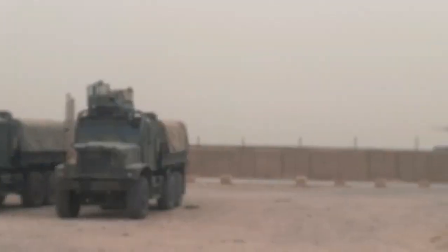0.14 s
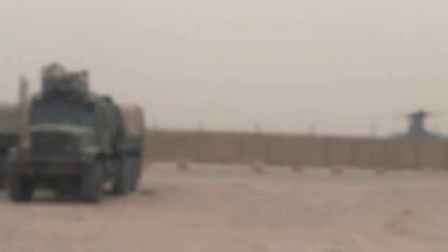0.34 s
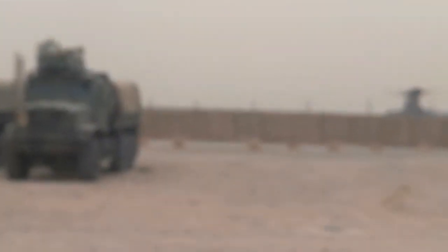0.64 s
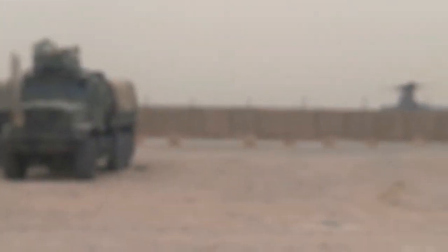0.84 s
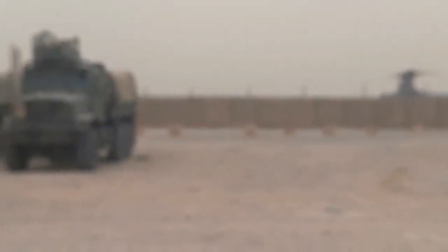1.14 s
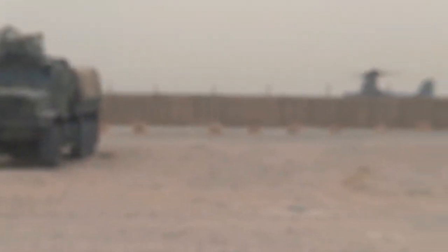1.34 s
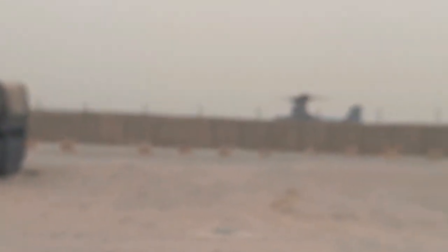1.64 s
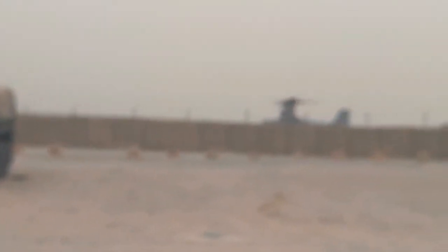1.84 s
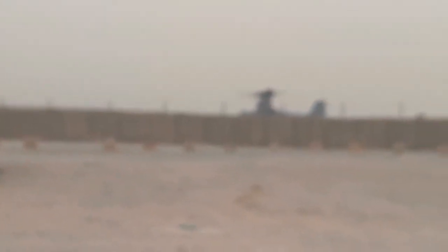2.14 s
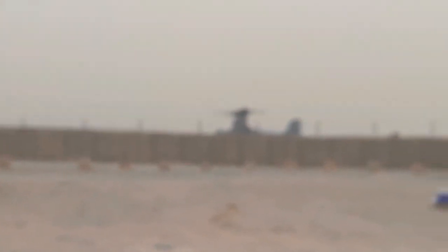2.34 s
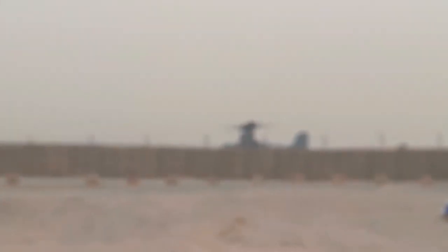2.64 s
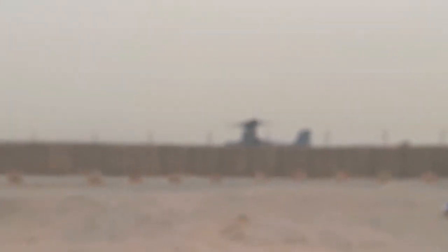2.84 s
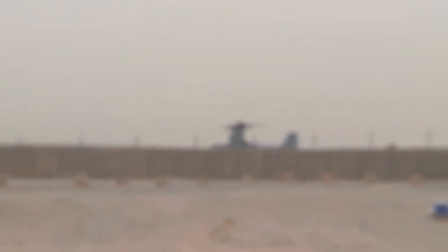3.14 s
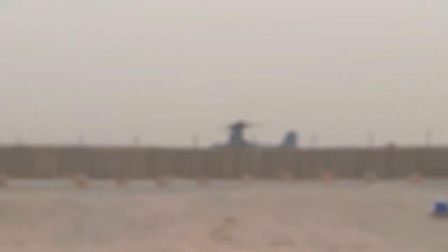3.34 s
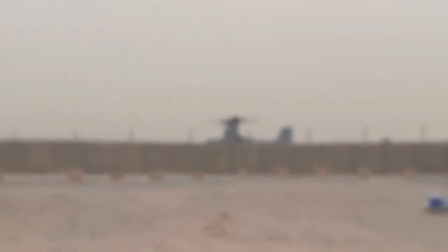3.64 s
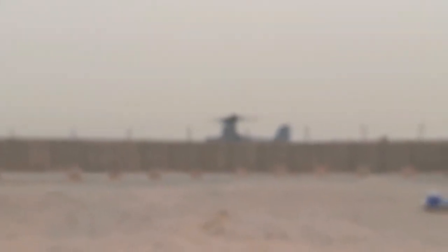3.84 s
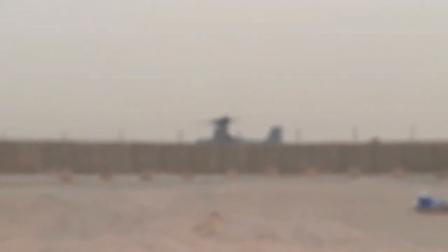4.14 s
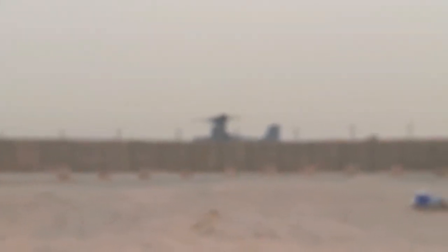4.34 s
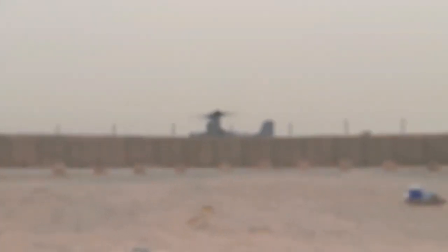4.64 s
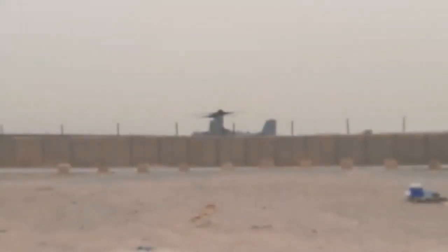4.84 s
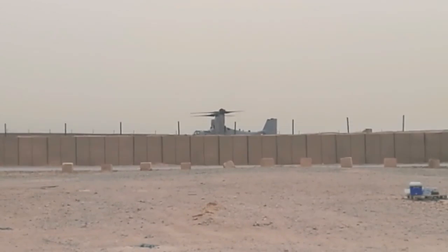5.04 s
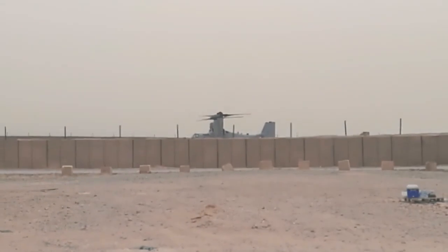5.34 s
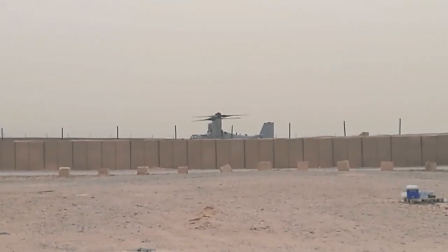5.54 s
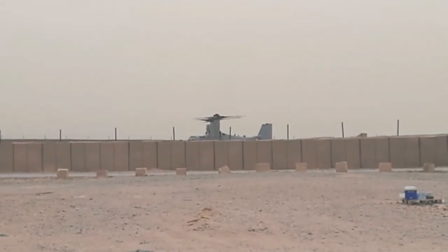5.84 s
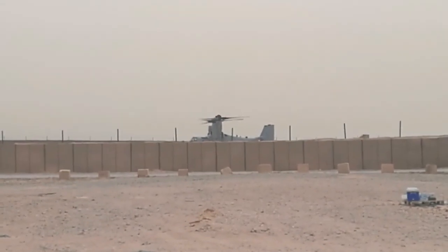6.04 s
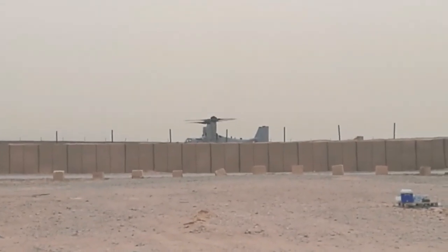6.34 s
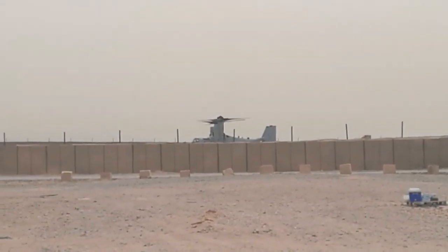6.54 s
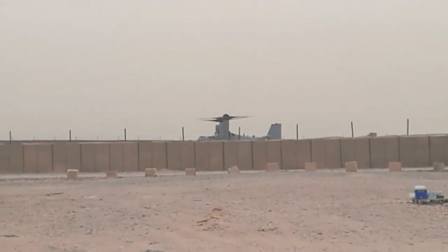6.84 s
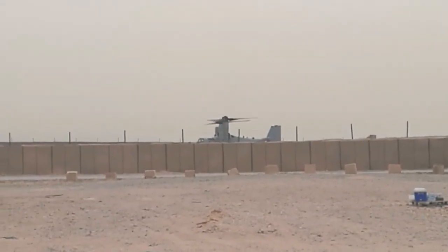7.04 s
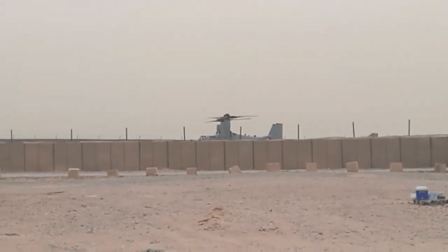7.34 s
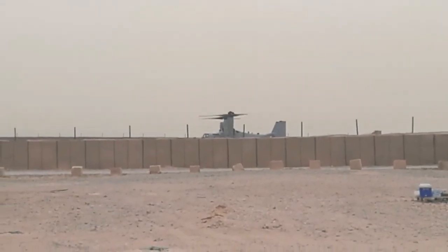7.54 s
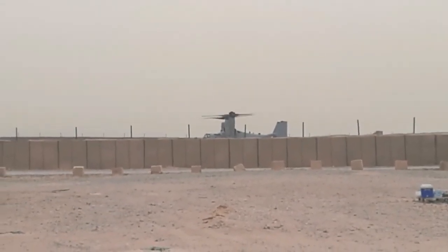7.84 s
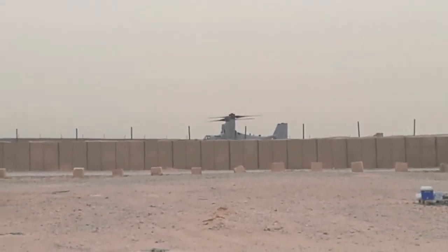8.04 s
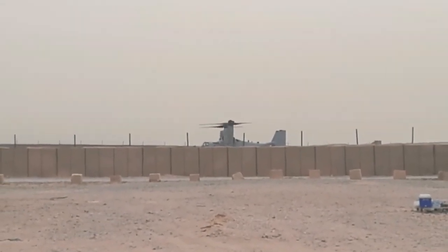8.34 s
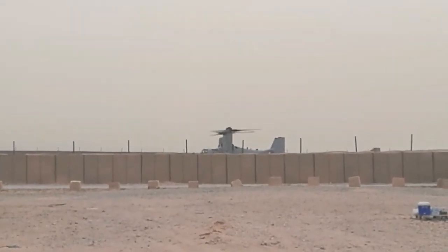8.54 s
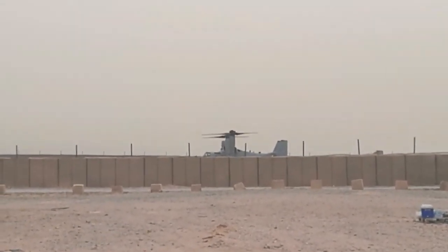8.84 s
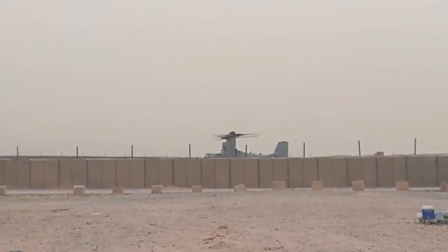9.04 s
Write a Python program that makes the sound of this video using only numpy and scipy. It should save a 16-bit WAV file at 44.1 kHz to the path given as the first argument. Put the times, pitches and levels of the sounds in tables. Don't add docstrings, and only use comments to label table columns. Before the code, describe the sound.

A tiltrotor aircraft runs on the ground behind a wall across an open gravel yard. Two rotors give a fast, regular thumping, around twenty beats a second, with slapping puffs inside a continuous turbine roar. Faint gearbox whines waver underneath. Thin high squeaks appear briefly from about three seconds, and a soft air hiss opens near eight. A small stereo microphone hears it from afar.

```python
import sys
import numpy as np
from scipy import signal
from scipy.fft import rfft, irfft, next_fast_len
from scipy.io import wavfile
from scipy.ndimage import uniform_filter1d

SR = 44100
rng = np.random.default_rng(int(sys.argv[2]) if len(sys.argv) > 2 else 0)


def rack_gain(trim_db):
    fader = np.asarray(trim_db, float)
    return 10 ** (fader / 20)


def store_wav(level_fs):
    pcm = np.round(np.clip(np.atleast_2d(level_fs), -1, 1) * 32767)
    wavfile.write(sys.argv[1], SR, pcm.T.astype(np.int16))


N = 405279
BLADES_PER_S, CYCLE_START_S = 20.4786, -.0007

# (time [s], first rotor delay [ms], second rotor delay [ms])
PATH_DRIFT = [(0, 1.8, 2.1), (.78, 1.9, 1.6), (1.02, -.1, 1), (1.5, .5, 1.3), (2.02, -.1, 1.9),
              (2.25, -.4, -.7), (2.98, -.5, -.7), (3.8, -1.4, .7), (4.69, -.7, .2), (5.1, 1.2, .3),
              (5.5, 0, .6), (6.3, 0, 0), (6.8, -.9, .5), (7.2, -.8, -.2), (7.8, -.3, .7), (8.11, .9, .5),
              (8.55, .4, .5), (8.85, .6, 2.1)]
# (time [s], gust level [dB], clear air level [dB],
# low slap strength [dB], high slap strength [dB])
YARD_WIND = [(0, 1.5, -0.5, 13.5, -1), (.5, 2.5, -1, 10, -2), (1, 1, -0.5, 17.5, -3.5),
             (1.8, 1.5, 0.5, 9.5, 5), (2.15, 1.5, -0.5, 5, 3), (2.6, 1.5, -0.5, 12, 2),
             (3.1, 1.5, 0, 9, -5), (3.5, 1.5, 0.5, 9.5, 1), (4.2, 1, -.5, 17.5, 5), (4.75, 1, 0.5, 16, 0),
             (5.2, 1, 0, 15.5, 7), (5.8, 1, -1, 14, 3.5), (6.3, 0.5, -0.5, 19, 7), (6.9, 1, 0.5, 2, 0),
             (7.25, 2, 0.5, -12, 4.5), (7.6, 1.5, -0.5, -14, -4.5), (8.4, 2.5, 0, 11.5, 2.5),
             (9.19, 3, 1.5, 18, 4.5)]
# (time [s], hollow level [dB], rumble level [dB])
DOWNWASH = [(0, -13, -2), (.7, -32, 0), (1.2, -20, 2), (1.7, -21, 1), (2.2, -41, 1), (2.7, -29, -3),
            (3.2, -25, 2), (3.7, -18.5, 4.5), (4.2, -16, 1), (4.65, -25, 5), (5.0, -33, 5.5),
            (5.6, -37, -1), (6.1, -15, 7.5), (6.6, -25, 4.5), (7.1, -43, 5), (7.6, -36, 5.5),
            (8.1, -30, 1.5), (8.7, -22, 4)]


def evened(x):
    return x / np.sqrt(np.mean(x ** 2) + 1e-20)


def read(points, hz):
    f, *values = np.transpose(points)
    return [np.interp(np.log(hz + 1), np.log(f + 1), v) for v in values]


def resonate(x, hz, width):
    turn = np.exp(2j * np.pi * hz * np.arange(x.shape[-1]) / SR)
    r = np.exp(-np.pi * width / SR)
    return 2 * (turn * signal.lfilter([1 - r], [1, -r], x / turn)).real


def ports(direct, scattered, colour=np.ones_like):
    # (frequency [Hz], likeness [0-1], left lead [rad], left-right level [dB])
    port_match = [(30, .998, .1, .5), (120, .997, .27, .6), (200, .97, .31, .4), (290, .84, .18, .2),
                  (385, .58, 1.1, -1.8), (435, .42, 1.8, .5), (520, .8, 2.3, 4.5), (620, .63, 1.8, 7),
                  (700, .66, 1.2, 5), (840, .72, 1.2, 1), (920, .58, 1.7, -2), (1000, .58, 2.5, 0),
                  (1200, .23, 1.1, .5), (1500, .2, -.3, -4.3), (1700, .38, -1, -4.5), (2100, .54, .4, -5.5),
                  (2300, .35, 1.5, -7.7), (2550, .35, 3, -7), (2850, .25, 4.5, -4), (3300, .3, 6.2, 0),
                  (4500, .1, 6, .4), (5500, .27, 7.4, -.8), (6500, .26, 8.7, 1.6), (8100, .24, 7.5, -1),
                  (9500, .3, 8.2, -1), (15000, .3, 8.2, 0)]
    size = next_fast_len(N)
    hz = np.fft.rfftfreq(size, 1 / SR)
    like, lead, lean_db = read(port_match, hz)
    like = np.clip(like, 0, 1)
    a, b = rfft(direct, size), rfft(scattered, size)
    left = a * rack_gain(lean_db / 2) * np.exp(.5j * lead)
    mixed = like * a + np.sqrt(1 - like ** 2) * b
    right = mixed * rack_gain(-lean_db / 2) * np.exp(-.5j * lead)
    return irfft(np.array([left, right]) * colour(hz), size)[:, :N]


def yard(x, wet, t60, hold_s):
    hop, lag = round(hold_s * SR), np.arange(4000) / SR
    padded = np.pad(x, ((0, 0), (hop, 2 * hop)))
    echoes = np.zeros((2, N + 3 * hop + 4000))
    fade = signal.windows.cosine(2 * hop)
    for start in range(0, N + hop, hop):
        tail = rng.standard_normal((2, 4000)) * rack_gain(-60 * lag / t60) * (lag > .002)
        part = padded[:, start:start + 2 * hop] * fade
        wash = signal.fftconvolve(part, tail / np.linalg.norm(tail[0]), axes=1)
        echoes[:, start:start + 2 * hop + 3999] += wash
    return np.sqrt(1 - wet ** 2) * x + wet * echoes[:, hop:hop + N]


def train(place, late_ms, size_db):
    out = np.zeros(next_fast_len(N + SR))
    t = CYCLE_START_S + (np.arange(len(size_db)) + place) / BLADES_PER_S + late_ms / 1000
    out[np.round(t * SR).astype(int)] = rack_gain(size_db)
    return out


def valve():
    opens_s, rise_s, level_db = 7.8, .067, -49.5
    air = rng.standard_normal((2, N))
    whistle = evened(resonate(resonate(air, 8080, 260), 8080, 260))
    whistle *= rack_gain(np.array([[-6.], [1.5]]))
    hiss = evened(resonate(resonate(air, 7800, 900), 7800, 900))
    opening = np.clip((np.arange(N) / SR - opens_s) / rise_s, 0, 1)
    return rack_gain(level_db) * opening * (whistle + 1.4 * hiss)


def squeaks():
    # (start [s], length [s], frequency [Hz], glide [Hz/s], peak level [dB])
    squeals = [(2.793, .075, 14150, 1507, -57), (2.86, .08, 14550, 99, -65), (2.92, .1, 14250, -2500, -66),
               (3.02, 0.11, 13850, -800, -68), (3.19, 0.058, 13400, -5000, -56),
               (2.885, 0.1, 10950, 96, -65), (4.62, .06, 13850, 102, -62), (4.67, .09, 14350, -4000, -66),
               (4.74, 0.088, 13900, -1500, -56), (4.67, 0.096, 10500, -1000, -64),
               (5.17, 0.12, 9100, -1000, -56), (5.3, 0.074, 8800, 3000, -52), (5.387, 0.04, 8600, 498, -56),
               (5.4, .46, 15500, 698, -67), (5.9, .07, 14350, 9004, -64), (5.82, 0.1, 14150, 2000, -61),
               (5.83, .11, 10800, 202, -60), (5.86, .36, 15400, -100, -61), (6.068, 0.11, 15180, 507, -64),
               (6.03, .11, 14200, 804, -59), (6.12, .05, 13600, 91, -71), (8.643, 0.13, 14200, -300, -51),
               (8.77, .095, 14220, 379, -54), (8.78, 0.18, 15230, -100, -61), (8.58, .06, 13500, 500, -70)]
    level_db, arch, waver_hz = 13.5, 1.3, 40
    out = np.zeros(N)
    for start, length, hz, glide, db in squeals:
        t = np.arange(0, length, 1 / SR)
        waver = evened(uniform_filter1d(rng.standard_normal(SR // 2), size=400))[:len(t)]
        tone = np.sin(2 * np.pi * np.cumsum(hz + glide * t + waver_hz * waver) / SR)
        swell = np.sin(np.pi * t / length) ** arch
        out[round(start * SR):][:len(t)] += rack_gain(db) * swell * tone
    return rack_gain(level_db) * np.array([out, .3 * np.roll(out, 1)])


def gears():
    # (frequency [Hz], width [Hz], level [dB], left-right level [dB])
    gear_tones = [
        (1102, 3.5, -48.5, 3),
        (1971, 5, -49.5, -2),
        (2205, 4, -50, -2),
        (5410, 6, -63, 0),
        (5680, 70, -51.5, 0),
    ]
    # (time [s], level [dB])
    gear_load = [(0, -3), (.5, -6), (1.8, -6), (2.1, 3), (2.75, 5), (3, -5), (3.6, -4), (3.8, 4), (4.5, -1),
                 (5, -5), (5.4, 5), (6.5, 6), (6.9, -3), (7.9, -4), (8.2, 3), (8.6, 0), (9.19, 1)]
    t = np.arange(N) / SR
    out = np.zeros((2, N))
    for hz, width, db, lean_db in gear_tones:
        tone = resonate(resonate(rng.standard_normal((2, N)), hz, width), hz, 3 * width)
        if width < 6:
            tone += .05 * np.sin(2 * np.pi * hz * t)
        out += rack_gain(db) * evened(tone) * rack_gain(lean_db * np.array([[.5], [-.5]]))
    return out * rack_gain(np.interp(t, *np.transpose(gear_load)))


def drifting(frames, across, along):
    patches = rng.standard_normal((frames, 129)).T
    return evened(uniform_filter1d(uniform_filter1d(patches, size=across, axis=0), size=along, axis=1))


def roar():
    # (frequency [Hz], density [dB/Hz])
    roar_colour = [(25, -6), (60, -10), (90, -5), (150, -3), (250, -7.5), (340, -13.5), (390, -17.5),
                   (450, -24.5), (540, -16), (640, -14), (860, -12), (1020, -17), (1250, -10),
                   (1900, -11.8), (2200, -12), (2450, -15.5), (2800, -17.5), (16000, -17)]
    # (frequency [Hz], level [dB])
    distance = [(2600, 0), (3500, 2), (4100, -1.5), (4450, -2.5), (4900, -2), (5700, -5), (7000, -12),
                (8800, -17), (9600, -27.5), (10050, -24), (10550, -31), (11200, -35.5), (12000, -30),
                (13000, -44), (14000, -51), (14800, -66)]
    gust_hz = (750, 1700, 4500, 11000)
    gust_share = (2.32, 0.86, 1.5, 0.74)
    clear_share = (-0.89, -0.45, 0.95, 0.98)
    # (frequency [Hz], width [octaves], place in cycle [0-1], length [ms],
    # extra level [dB], strength column [wind column; above 3.5 the dust])
    slaps = [
        (770, .12, .51, 3.1, -1, 2),
        (725, .16, .26, 8, -5, 2),
        (1900, .4, .83, 2.8, -1, 3),
        (2000, .53, .1, 3.5, -5.5, .5),
        (1350, .2, .75, 3, -7, 3),
        (3600, .87, .86, 2.2, 0, 4),
        (3100, .7, .16, 2.9, 2, 6),
    ]
    # (time [s], top hiss level [dB], slap reach [dB])
    dust = [(0, 4.5, 2.5), (.35, -1, 1), (.6, 0, -12), (1.5, 2.5, -15), (2.1, 2, -7), (2.5, 0.5, -3),
            (3.1, -1, -2), (3.5, 1.5, -17), (4.2, -3, -4), (4.6, 1.5, -10), (5.25, -3, -13), (5.6, 0, -14),
            (6.1, 1.5, -17), (6.6, -1, -13), (7.3, 1, -2), (7.9, 3, -1), (8.5, -2.5, 3.5), (9.19, 0, -7)]
    level_db, flicker_db, patchy_db = -23, .5, 1.4
    puff_db, puff_late_ms = .9, .6
    thin_above_hz, thin_patch_db = 8950, 4

    frames, hz = N // 64 + 5, np.fft.rfftfreq(256, 1 / SR)
    t = np.arange(frames) * 64 / SR
    s, *gusts = np.transpose(YARD_WIND)
    bands_db = np.outer(gust_share, np.interp(t, s, gusts[0]))
    bands_db += np.outer(clear_share, np.interp(t, s, gusts[1]))
    share = np.array([np.interp(np.log(hz + 1), np.log(gust_hz), row) for row in np.eye(4)])

    patches = drifting(frames, 3, 50)
    flicker = evened(uniform_filter1d(rng.standard_normal(frames), 12))
    when, top_db, reach_db = np.transpose(dust)
    thin_db = thin_patch_db * drifting(frames, 5, 90) + np.interp(t, when, top_db)
    thin_db *= (hz > thin_above_hz)[:, None]
    gusty, _, rumble_db = np.transpose(DOWNWASH)
    thin_db += np.outer(np.clip(1.5 - hz / 300, 0, 1), np.interp(t, gusty, rumble_db))

    power = np.ones((129, frames))
    for f, octaves, place, ms, db, column in slaps:
        turns = (t - CYCLE_START_S) * BLADES_PER_S - place + .5
        chance = np.clip(rng.standard_normal((int(turns[-1]) + 2, 2)), -1.6, 1.6)
        chance = chance[turns.astype(int)]
        if column > 3.5:
            strength_db = np.interp(t, when, reach_db)
        else:
            strength_db = np.interp(t, s, gusts[round(column)])
        off_ms = (turns % 1 - .5) / BLADES_PER_S * 1000 - puff_late_ms * chance[:, 0]
        puff = rack_gain(db + strength_db + puff_db * chance[:, 1]) ** 2 * np.exp(-.5 * (off_ms / ms) ** 2)
        band = np.exp(-.5 * (np.log2(hz / f + 1e-9) / octaves) ** 2)
        power += band[:, None] * puff
    power /= uniform_filter1d(power, 340, 1)

    level = share.T @ bands_db + patchy_db * patches + thin_db + flicker_db * flicker
    field = np.sqrt(power) * rack_gain(level)
    re, im = rng.standard_normal((frames, 129, 2, 2)).T
    pair = signal.istft((re + 1j * im) * field, nperseg=256, noverlap=192)[1][:, :N]
    heard = ports(*pair, lambda f: rack_gain(read(roar_colour, f)[0] + read(distance, f)[0]))
    return rack_gain(level_db) * evened(heard)


def crack():
    # (frequency [Hz], width [Hz], place in cycle [0-1],
    # level [dB], wind column [index])
    cores = [
        (680, 290, .545, -38, 2),
        (1890, 800, .865, -37.5, 3),
    ]
    jitter_ms, uneven_db, follow = .22, 0.0, .69
    s, *gusts = np.transpose(YARD_WIND)
    t = np.arange(int(N / SR * BLADES_PER_S)) / BLADES_PER_S
    rings = 0
    for hz, width, place, db, column in cores:
        chance = rng.standard_normal((len(t), 4))
        size_db = follow * np.interp(t, s, gusts[column])
        clicks = np.array([
            train(place, jitter_ms * chance[:, c], size_db + uneven_db * chance[:, 2 + c])[:N]
            for c in range(2)])
        rings = rings + rack_gain(db) * evened(resonate(resonate(clicks, hz, width), hz, width))
    return ports(*yard(rings, wet=.7, t60=.05, hold_s=.3))


def vortex_bursts(strikes, level_db, width_ms):
    fall = .12
    ring_width = 1600 / width_ms
    out, t = np.zeros((2, N + 900)), np.arange(900) / SR
    u = t * 1000 / width_ms - 3
    for s, db, hz in strikes:
        noise = rng.standard_normal((2, 1300))
        ring = evened(resonate(resonate(noise, hz, ring_width), hz, ring_width)[:, 400:])
        tone = np.sin(2 * np.pi * np.cumsum(hz * (1 - fall * np.tanh(u / 2))) / SR)
        first = max(round((s - width_ms / 700) * SR), 0)
        out[:, first:][:, :900] += rack_gain(db + level_db) * np.exp(-.5 * u ** 2) * (.5 * ring + tone)
    return ports(*out[:, :N])


def tip_snaps():
    # (time [s], peak level [dB], frequency [Hz])
    tip_strikes = [(0.0548, -17, 1970), (0.1022, -20, 2050), (0.1501, -18, 1950), (0.2009, -17, 1900),
                   (0.2478, -18, 2080), (0.7362, -18, 1760), (0.9747, -20, 1760), (1.1662, -20, 1790),
                   (1.3608, -18, 1870), (1.4496, -17, 2090), (1.7634, -16, 1830), (1.9869, -22, 2100),
                   (2.0877, -19, 2020), (2.2832, -17, 2110), (2.6254, -19, 2200), (3.0619, -21, 1930),
                   (3.2625, -20, 2200), (3.456, -17, 1780), (3.5059, -20, 1840), (3.8003, -18, 1940),
                   (4.339, -18, 2040), (4.4328, -22, 1920), (4.9232, -18, 1780), (4.9721, -15, 1730),
                   (5.1657, -19, 1950), (5.218, -19, 2190), (5.2649, -16, 1730), (5.3118, -20, 1800),
                   (5.3617, -16, 1890), (5.46, -13, 1960), (5.5084, -15, 2060), (5.5578, -14, 1960),
                   (5.6555, -20, 2010), (5.7044, -17, 2130), (5.7533, -18, 1730), (5.7932, -19, 2040),
                   (5.9958, -20, 1970), (6.0826, -18, 1680), (6.1779, -20, 2200), (6.2387, -19, 2200),
                   (6.3385, -15, 1900), (6.4348, -18, 2190), (6.4847, -15, 1820), (6.5196, -17, 1730),
                   (6.6353, -19, 2080), (6.6832, -17, 2110), (6.7635, -18, 2110), (6.8743, -21, 1930),
                   (7.2235, -18, 2020), (7.2823, -20, 2070), (7.4056, -20, 2060), (7.6435, -21, 1510),
                   (8.4342, -19, 1990), (8.5844, -15, 2170), (8.6802, -20, 2080), (8.7345, -17, 2080),
                   (8.7819, -18, 1560), (8.8263, -19, 2050), (8.9236, -20, 1930), (9.0259, -17, 1720)]
    return vortex_bursts(tip_strikes, level_db=-4.5, width_ms=.98)


def root_thwacks():
    # (time [s], peak level [dB], frequency [Hz])
    root_strikes = [(0.027, -20, 848), (0.062, -23, 837), (0.158, -23, 711), (0.596, -24, 786),
                    (0.7, -24, 840), (0.803, -20, 818), (1.004, -24, 783), (1.15, -24, 767),
                    (1.198, -21, 778), (1.233, -23, 786), (1.441, -24, 789), (1.688, -24, 789),
                    (1.929, -23, 867), (2.062, -25, 837), (2.302, -25, 877), (2.842, -25, 818),
                    (3.343, -27, 853), (3.59, -23, 781), (3.64, -22, 721), (3.964, -25, 633),
                    (4.063, -25, 721), (4.306, -23, 703), (4.371, -21, 867), (4.406, -23, 775),
                    (4.455, -25, 681), (4.668, -22, 794), (4.861, -22, 856), (4.939, -25, 883),
                    (5.152, -23, 622), (5.202, -19, 729), (5.25, -20, 751), (5.346, -22, 786),
                    (5.694, -22, 875), (5.79, -21, 805), (5.835, -23, 813), (5.883, -20, 748),
                    (5.922, -23, 810), (5.985, -22, 859), (6.031, -23, 681), (6.226, -22, 622),
                    (7.106, -26, 807), (7.353, -24, 791), (8.362, -22, 713), (8.604, -25, 641),
                    (8.653, -27, 638), (8.802, -24, 681), (8.959, -22, 864), (9.008, -23, 727),
                    (9.056, -20, 869), (9.095, -25, 872)]
    return vortex_bursts(root_strikes, level_db=-3, width_ms=2.41)


def hollows():
    place, width_ms, uneven_db = .197, 1.9, 2.0
    s, late_ms, _ = np.transpose(PATH_DRIFT)
    when, depth_db, _ = np.transpose(DOWNWASH)
    t = np.arange(int(N / SR * BLADES_PER_S) + 1) / BLADES_PER_S
    size_db = np.interp(t, when, depth_db) + uneven_db * rng.standard_normal(len(t))
    clicks = train(place, np.interp(t, s, late_ms), size_db)
    u = np.arange(-600, 601) / SR * 1000 / width_ms
    dip = signal.oaconvolve(clicks, (u ** 2 - 1) * np.exp(-.5 * u ** 2), "same")[:N]
    return ports(dip, dip)


def thumps():
    # (frequency [Hz], level [dB])
    thump_colour = [(15, -56), (22, -50), (40, 3), (60, 2.5), (100, 2), (125, -0.5), (150, -0.5), (185, -8),
                    (250, -12.5), (330, -28.5), (450, -27.5), (650, -37), (950, -26.5), (1300, -73)]
    # (place in blade cycle [0-1], pulse tilt [rad], boom at 85 Hz [dB], edge above 200 Hz [dB])
    rotors = [
        (.28, 1.1, 0, 0),
        (.612, .95, 4, -5),
    ]
    # (time [s], first rotor level [dB], second rotor level [dB],
    # sharpness [dB])
    carrying = [(0, -7, -12, 0), (.78, -13, -16, -7), (1.1, -22, -18.5, 9), (1.5, -16.5, -18, 2.5),
                (2, -17, -17.5, -1), (2.3, -16, -12, -3), (2.95, -13.5, -15, 4.5), (3.3, -11, -14, 2),
                (3.85, -13, -19.5, 7), (4.5, -10.5, -20, 2.5), (5.0, -17, -14.5, 2), (5.42, -13, -13, 3.5),
                (6.3, -17, -15.5, 0), (6.65, -10, -15.5, 4.5), (7.1, -15.5, -15, 3), (7.7, -19, -13, 3.5),
                (8.3, -14.5, -15, 2), (8.8, -18, -12, 6.5)]
    jitter_ms, uneven_db, bass_db = .3, .5, -.2
    bass_follow, bass_tilt = .4, .85

    s, *late = np.transpose(PATH_DRIFT)
    when, *carry = np.transpose(carrying)
    t = np.arange(int(N / SR * BLADES_PER_S) + 1) / BLADES_PER_S
    pairs = [0, 0]
    for k, (place, tilt, boom_db, edge_db) in enumerate(rotors):
        chance = rng.standard_normal((len(t), 4))
        late_ms = np.interp(t, s, late[k])
        size_db = np.interp(t, when, carry[k])
        usual_db = size_db.mean()
        for part, follow in enumerate((1, bass_follow)):
            clicks = []
            for c in range(2):
                click_late_ms = late_ms + follow * jitter_ms * chance[:, c]
                swing_db = size_db - usual_db + uneven_db * chance[:, 2 + c]
                clicks.append(train(place, click_late_ms, usual_db + follow * swing_db))
            clicks = np.array(clicks)
            hz = np.fft.rfftfreq(clicks.shape[1], 1 / SR)
            colour_db = read(thump_colour, hz)[0]
            colour_db = colour_db + boom_db * np.exp(-((hz - 85) / 30) ** 2)
            colour_db += edge_db * np.clip(hz / 100 - 1, 0, 1)
            pulse = rack_gain(colour_db) * np.exp(-1j * tilt * np.clip(hz / 130, bass_tilt, 1))
            peak = np.ptp(irfft(pulse)) / 2
            pairs[part] = pairs[part] + irfft(rfft(clicks) * pulse)[:, :N] / peak

    highpass = signal.butter(3, 155, "high", fs=SR, output="sos")
    top, steady_top = signal.sosfiltfilt(highpass, pairs)
    bass = pairs[1] - steady_top
    sharp = rack_gain(np.interp(np.arange(N) / SR, when, carry[-1]))
    return ports(*(rack_gain(bass_db) * bass + sharp * yard(top, wet=.62, t60=.2, hold_s=.3)))


def scene():
    background = valve() + squeaks() + gears() + roar()
    slaps = crack() + tip_snaps() + root_thwacks()
    return background + slaps + hollows() + thumps()


def top_cut(x):
    return signal.sosfilt(signal.butter(12, 15660, fs=SR, output="sos"), x)


def record(dry):
    return top_cut(dry)


dry = scene()
out = record(dry)
store_wav(out)
```